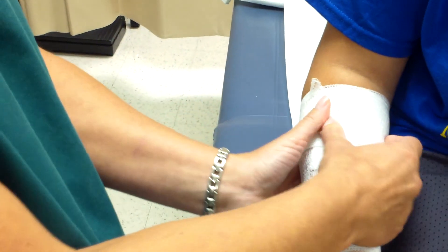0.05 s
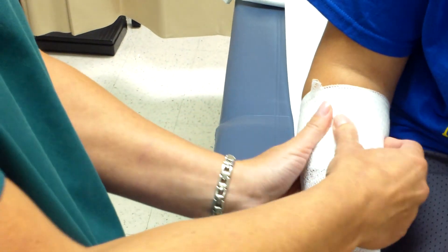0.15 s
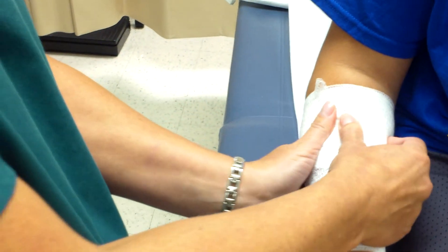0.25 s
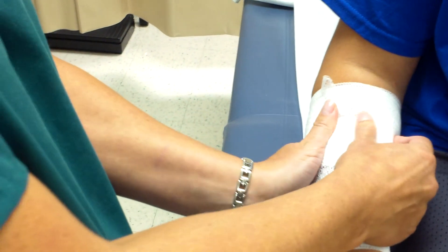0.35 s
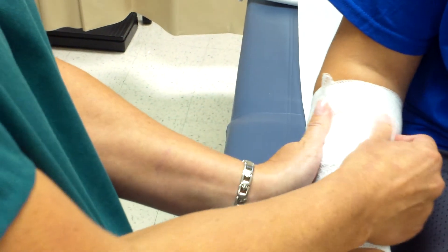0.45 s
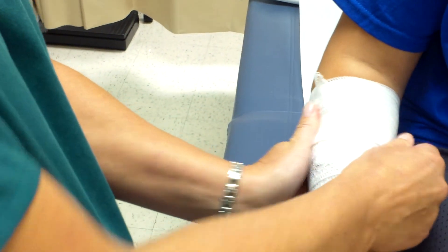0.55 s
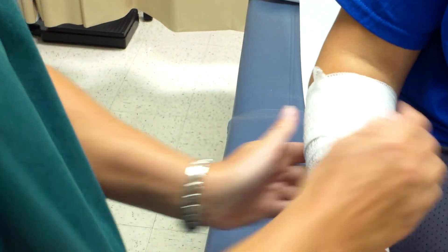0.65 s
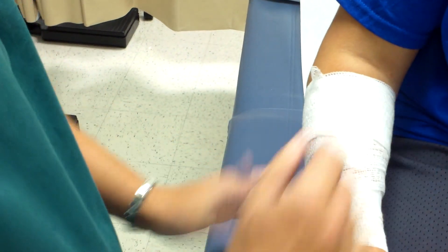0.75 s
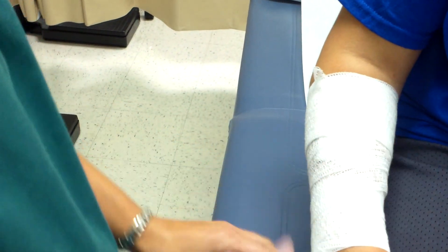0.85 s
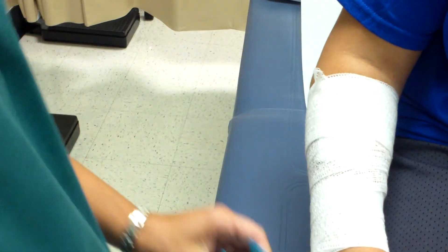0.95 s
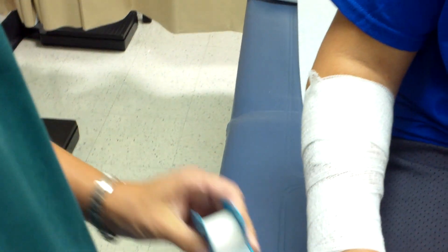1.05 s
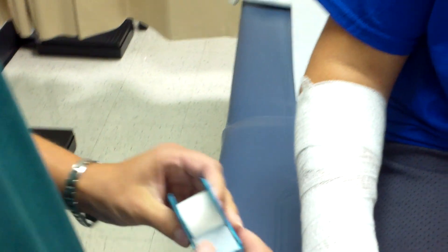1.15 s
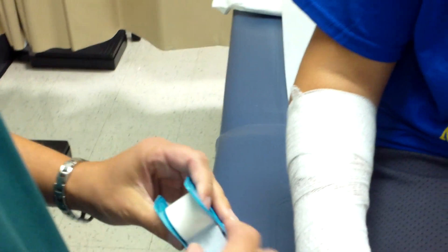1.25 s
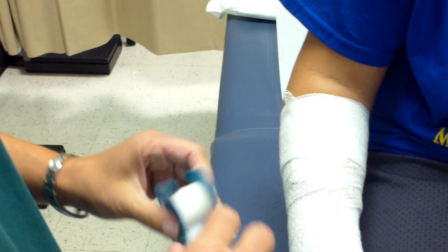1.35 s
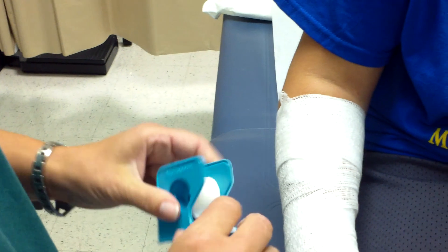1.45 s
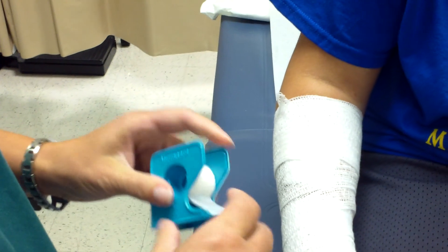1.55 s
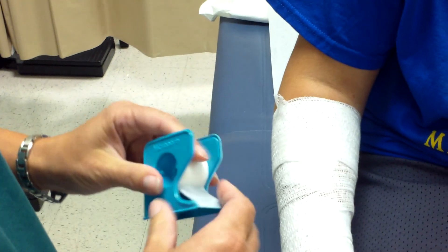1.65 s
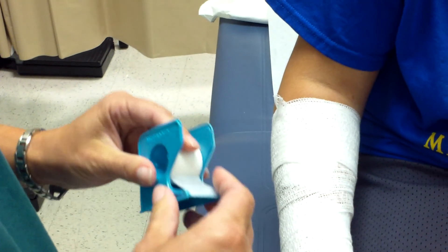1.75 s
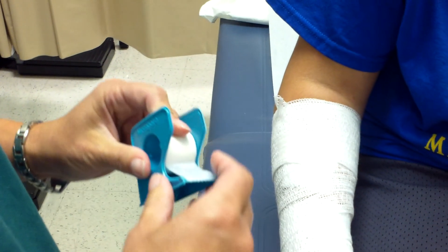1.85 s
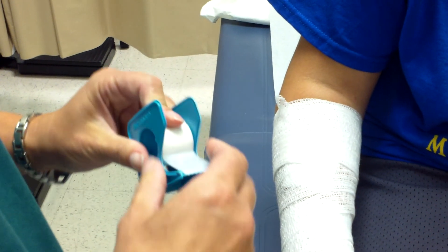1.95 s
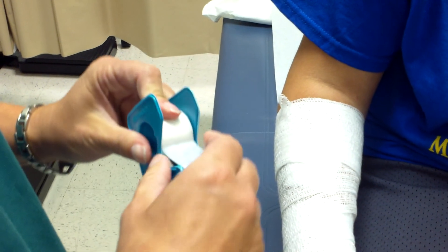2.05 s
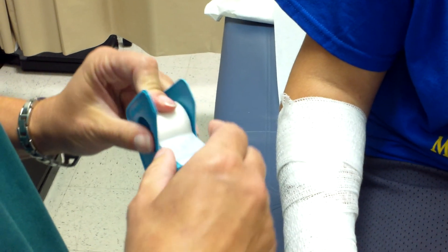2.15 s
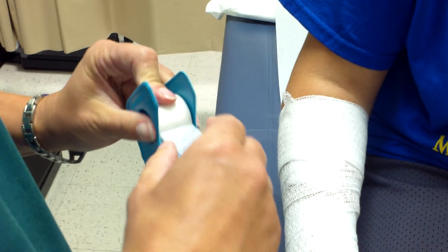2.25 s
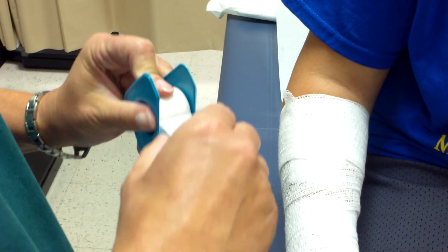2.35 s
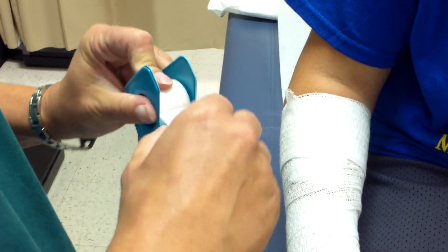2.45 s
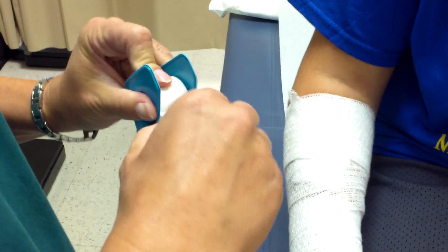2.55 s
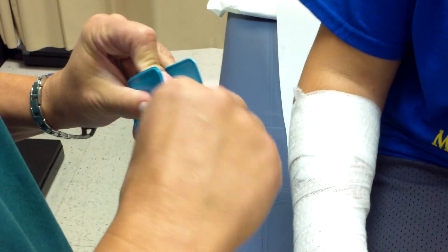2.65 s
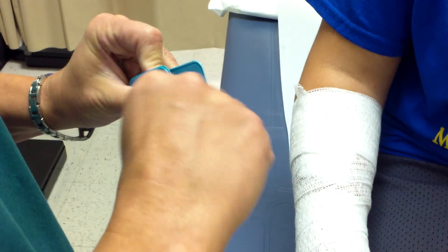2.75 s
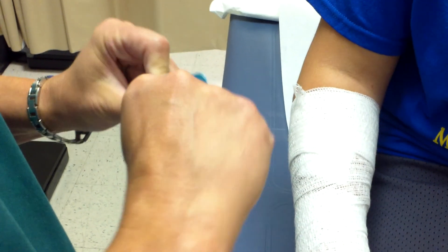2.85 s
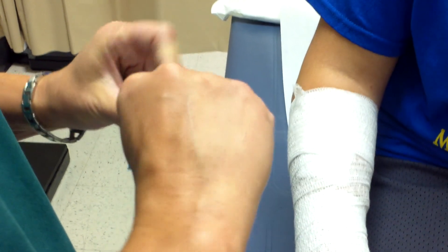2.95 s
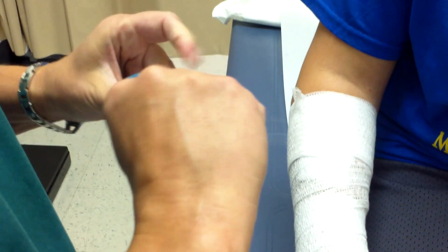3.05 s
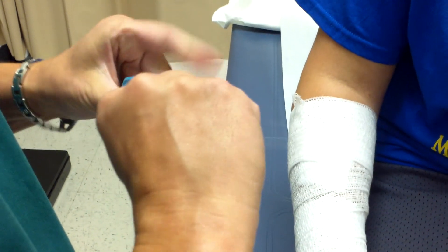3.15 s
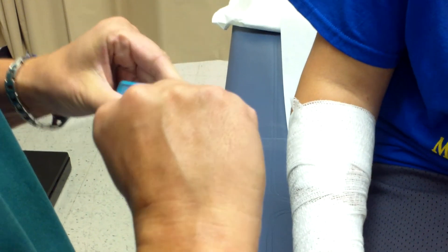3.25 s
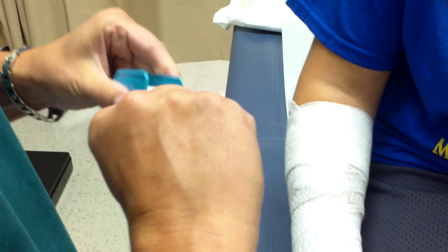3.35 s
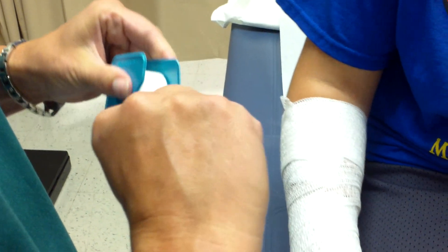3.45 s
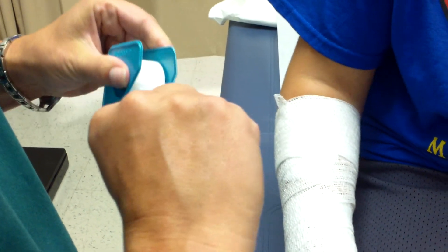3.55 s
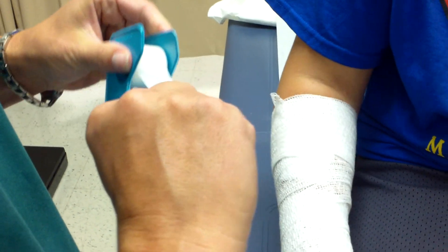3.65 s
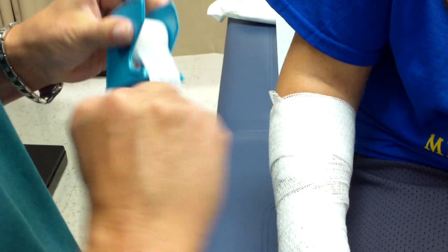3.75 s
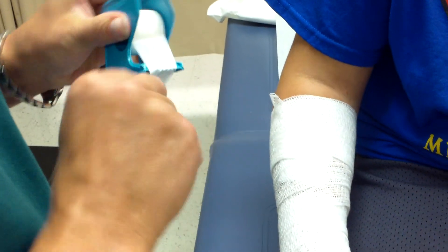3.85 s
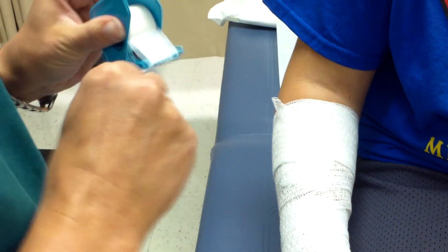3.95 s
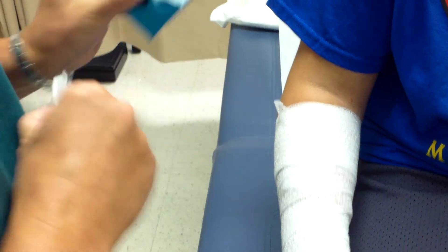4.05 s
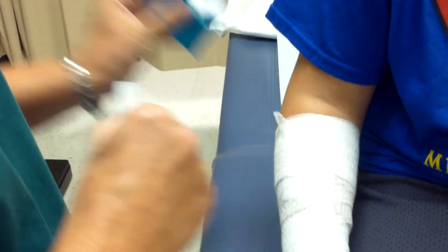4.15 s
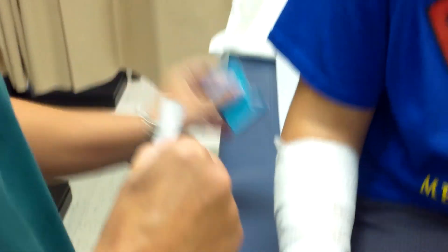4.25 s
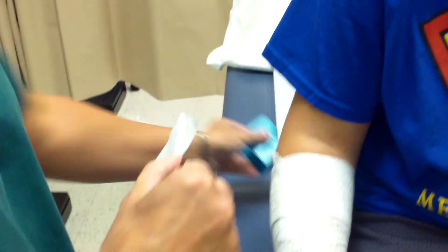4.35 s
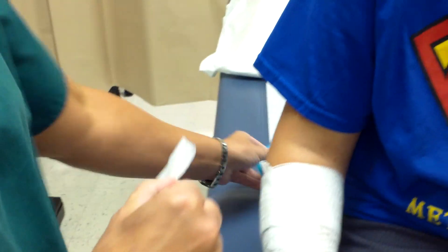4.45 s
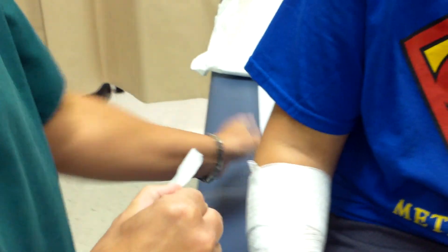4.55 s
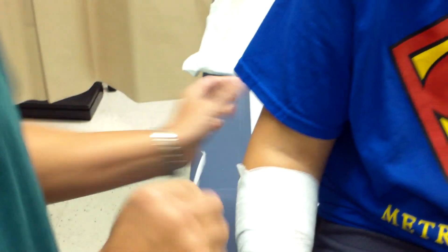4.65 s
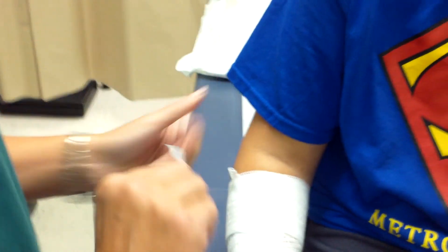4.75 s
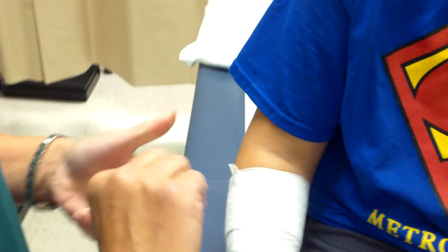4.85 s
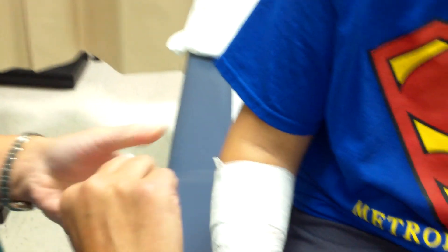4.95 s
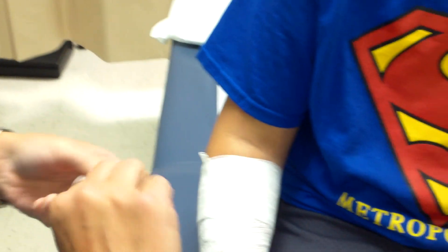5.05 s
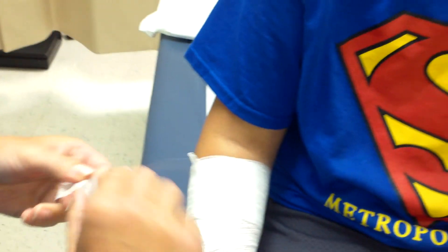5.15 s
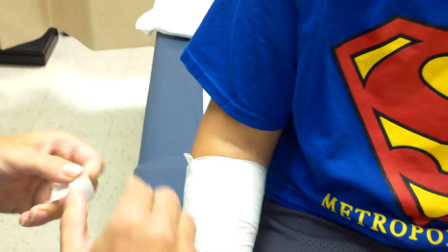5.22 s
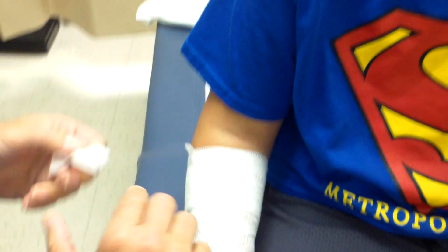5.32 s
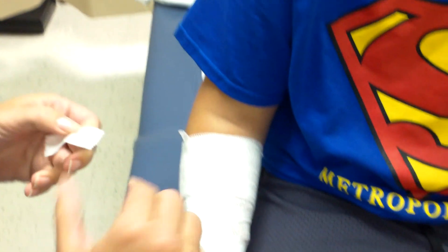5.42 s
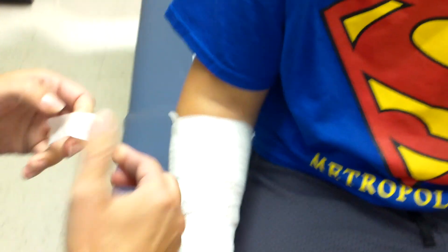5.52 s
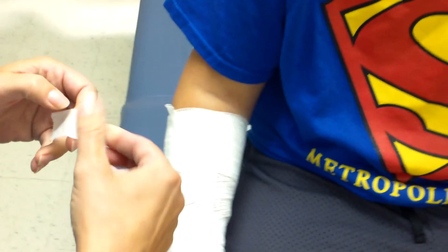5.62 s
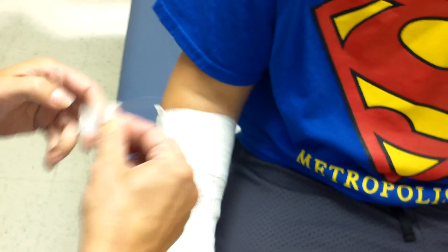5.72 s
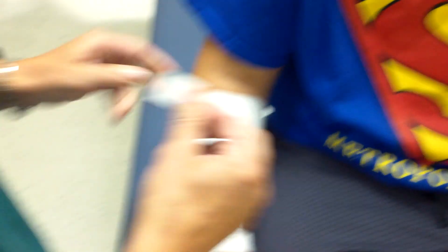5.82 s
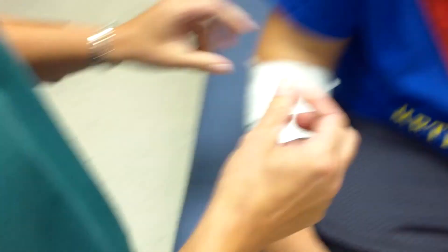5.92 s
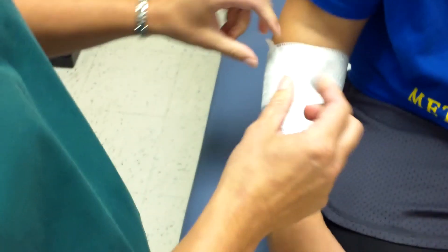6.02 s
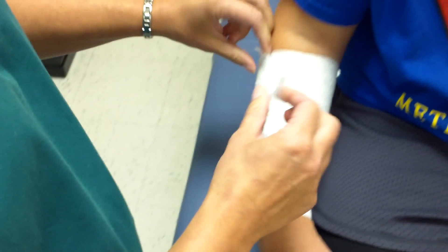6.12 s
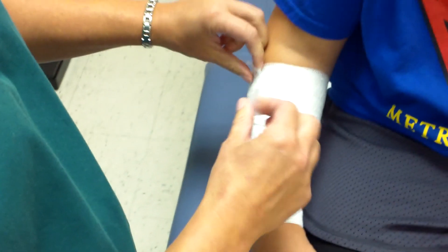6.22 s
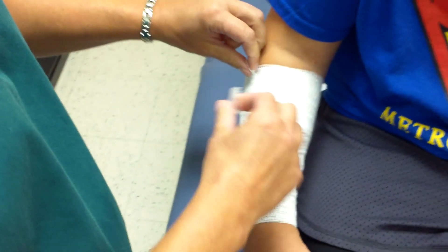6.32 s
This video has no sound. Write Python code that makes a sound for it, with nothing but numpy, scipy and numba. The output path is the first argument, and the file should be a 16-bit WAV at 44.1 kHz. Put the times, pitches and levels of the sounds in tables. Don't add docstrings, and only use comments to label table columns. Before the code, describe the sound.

Close up in a small ventilated room, hands brush over gauze with soft fibrous rustles. A hollow plastic dispenser is grabbed with a loud double clack, then turned with small creaks. A nail picks at the tape end, the glue crackles and snaps as tape peels, and a very short, sharp rip cuts through. The dispenser is put down with knocks; the sticky strip is then handled with pops, dry ticks and low air puffs.

```python
import sys
import numpy as np
from scipy import signal
from scipy.fft import rfft, irfft
from scipy.io import wavfile
from scipy.ndimage import uniform_filter1d
from numba import njit

SR = 44100
rng = np.random.default_rng(int(sys.argv[2]) if len(sys.argv) > 2 else 0)


def amplitude_ratio(level_db):
    exponent = np.asarray(level_db, float) / 20
    return 10 ** exponent


def wav_record(signal):
    frames = np.transpose(np.atleast_2d(signal))
    bounded = np.clip(frames, -1, 1)
    quanta = np.round(bounded * 32767).astype(np.int16)
    wavfile.write(sys.argv[1], SR, quanta)


N = 281336

# pitch_hz, density_db [dB per Hz]
AIR_COLOUR = [(20, -1), (45, 0), (110, -3), (210, -4.5), (500, -12), (1000, -17), (2000, -20), (4500, -27),
              (8000, -32), (16000, -38)]
# time_s, gain_db
GAIN_CONTROL = [
    (0, -0.5),
    (4.02, -0.5),
    (4.06, -9),
    (4.535, -7.5),
    (4.555, 2.5),
    (6.4, 1),
]
# time_s, level_db
GUSTS = [(.6, -47.5), (2.27, -68), (2.948, -52.5), (3.46, -48.5), (4.62, -51.5), (4.8, -49), (5.13, -47),
         (5.33, -55), (5.55, -48), (5.971, -50), (6.38, -52)]
# pitch_hz, width_hz, gain_db
PORT_MODES = [(3400, 300, 2), (6600, 1300, 4), (7860, 2200, -7.5), (9160, 1100, 6.5), (9850, 430, 2.5)]
# start_s, ring_db, ring_hz, thump_db, thump_hz
TAPS = [(.976, -36, 1530, -26, 420), (1.869, -40, 900, -34, 220), (1.893, -45, 3200, -35, 200),
        (1.9281, -21.5, 900, -29, 1400), (3.778, -38, 790, -32, 1100), (4.568, -33.5, 656, -31, 354),
        (4.667, -26.5, 624, -23.5, 234), (4.9438, -15.5, 1484, -32, 516), (5.2512, -27, 800, -45, 1310),
        (5.2504, -32, 1900, -50, 266), (5.2535, -32, 820, -55, 400), (5.3764, -27, 1550, -50, 613),
        (5.3739, -21, 1640, -50, 197), (5.505, -21, 1750, -50, 104), (5.51, -30, 1300, -50, 300),
        (5.774, -32.5, 800, -38, 400)]
# drop_s, push_db, dip_db, swing_hz, rebound [ratio to dip]
PUFFS = [
    (4.768, -50, -29, 55, .3),
    (4.907, -35, -34, 60, .2),
    (5.058, -50, -35, 90, .3),
    (5.114, -42, -35, 45, .6),
    (5.2502, -16.5, -29, 95, .1),
    (5.3737, -20, -25, 115, .4),
    (5.5053, -17, -18, 116, 1.2),
    (5.918, -37, -40, 30, .3),
    (5.994, -36, -38, 32, .3),
    (6.363, -36, -38, 35, .3),
]
# pitch_hz, width_hz, level_db
SHELL_MODES = [(2150, 430, -4.5), (3370, 200, 2), (4960, 1200, -41.5)]
# low_hz, high_hz, level_db
WEAVE_BANDS = [(3400, 6000, -3), (5900, 7400, 1), (8300, 10820, -0.5), (10200, 14500, -11)]
IDLE_HANDS = (-67.5, -63.5, -64)
# start_s, firmest_s, end_s, level_db, fineness [0 dull - 2 hissy]
STROKES = [(0, -0.01, 0.35, -45, 1.29), (0.155, 0.197, 0.23, -41.5, 2), (0.345, 0.41, 0.47, -41.5, 2),
           (.46, 0.53, 0.74, -40, 2.22), (0.623, 0.735, 1.005, -40.5, 1.14),
           (0.876, 0.946, 1.35, -43, 0.56), (1.11, 1.182, 1.33, -51.5, 1.2), (1.45, 1.52, 1.5, -56, 1.9),
           (1.83, 1.88, 2.17, -41, -0.1), (1.86, 1.935, 2.7, -55, 1.9), (2.25, 2.336, 2.44, -50, 1.1),
           (2.81, 2.89, 3.4, -42.5, 1.3), (3.121, 3.303, 3.42, -38, 1.8), (3.277, 3.48, 3.58, -36, 1.6),
           (3.4, 3.517, 3.59, -39.5, 1.1), (3.59, 3.7, 4.16, -46, 1.44), (3.754, 4.01, 4.04, -45.5, 1.1),
           (1.93, 1.938, 2.0, -33.5, -0.3), (4.55, 4.575, 4.76, -39.5, 2.33),
           (4.623, 4.673, 4.79, -39, -0.11), (4.65, 4.75, 4.9, -53, 1.6), (4.9, 5.39, 5.7, -49.5, -0.21),
           (5.6, 5.906, 5.8, -49.5, 1.1)]
# start_s, end_s, first_hz, last_hz, level_db
SINGS = [
    (1.275, 1.41, 3770, 3800, -58),
    (2.32, 2.455, 3300, 3200, -63),
    (2.704, 2.712, 2180, 2050, -46),
    (2.738, 2.754, 1900, 2050, -43),
    (3.18, 3.235, 2300, 2250, -48),
    (3.292, 3.443, 1970, 1110, -49.5),
    (3.458, 3.51, 1000, 850, -43),
    (3.535, 3.56, 750, 720, -41),
]
# start_s, end_s, first_hz, last_hz, level_db
OVERTONES = [
    (.39, .44, 6500, 6700, -51),
    (1.03, 1.06, 3450, 3450, -52),
    (3.19, 3.24, 4900, 4800, -48),
    (3.25, 3.29, 6800, 6800, -49),
    (3.39, 3.425, 3850, 3750, -45),
    (3.45, 3.47, 4700, 4600, -45),
    (3.49, 3.54, 3200, 3250, -43),
    (4.04, 4.075, 3950, 3950, -50),
    (4.1, 4.15, 3700, 3700, -63),
]
# start_s, end_s, first_hz, last_hz, level_db
FINE_HISS = [
    (.51, .535, 9600, 9300, -48),
    (.57, .67, 9600, 9600, -52),
    (3.02, 3.05, 9500, 9500, -55),
    (3.215, 3.25, 9800, 9600, -48),
    (3.3, 3.34, 9700, 10000, -45),
    (3.41, 3.445, 9200, 9200, -44),
    (3.47, 3.525, 9200, 9150, -42),
    (3.53, 3.6, 9200, 9200, -50),
]
# start_s, rise_s, fall_s, shell_db, treble_db
CRINKLES = [(0.959, 0.029, 0.04, -33, -44), (1.379, 0.028, 0.021, -45.5, -54), (1.5, 0.024, .014, -60, -53),
            (1.585, 0.043, 0.038, -47, -47), (1.698, 0.015, 0.032, -47.5, -50),
            (1.929, .0025, 0.07, -60, -65), (.495, .027, .06, -50, -46), (2.696, .012, .03, -56, -54),
            (2.728, .02, .035, -55, -53), (2.19, 0.037, .05, -55.5, -54), (2.31, .015, 0.13, -57.5, -70),
            (2.6, 0.008, 0.12, -51.5, -54), (2.862, 0.04, 0.062, -47.5, -62),
            (2.922, 0.0036, 0.11, -42, -42), (2.954, .004, 0.047, -35, -42), (3.05, .038, .036, -45.5, -58),
            (3.436, 0.04, 0.3, -44.5, -40), (3.756, .019, .03, -47.5, -46), (3.857, 0.029, .03, -50.5, -48),
            (4.553, 0.02, 0.04, -39.5, -38.5), (4.65, 0.014, 0.095, -37, -37.5),
            (5.338, 0.013, 0.03, -43, -54), (5.503, 0.0032, .018, -37.5, -53),
            (5.524, 0.012, 0.074, -47.5, -49), (5.747, 0.022, 0.045, -40, -41)]
# start_s, densest_s, end_s, level_db
THREADS = [
    (2.834, 2.926, 3.1, -44),
    (3.12, 3.25, 3.76, -53),
    (3.284, 3.48, 3.57, -45),
    (4.56, 4.58, 4.7, -57),
]
# start_s, shell_hz, shell_db, treble_db [peaks]
CREAKS = [(.9455, 2230, -27.5, -32), (.9763, 3350, -2, -6.5), (.996, 3350, 0, -4.5),
          (1.4138, 3160, -25, -25), (1.4995, 2810, -39, -52), (1.6034, 3140, -28, -23),
          (1.6196, 2700, -29, -26), (1.929, 1310, -31, -50), (1.9974, 799, -45, -28),
          (2.051, 3000, -36, -52), (3.7694, 750, -35, -45), (3.8575, 1320, -55, -23.5),
          (3.8706, 1950, -31, -18), (4.0356, 2100, -11, -15), (4.403, 10000, -46, -46),
          (4.5291, 4050, -42, -56), (4.5642, 760, -32, -17.5), (4.6329, 710, -23, -37),
          (4.6588, 2000, -19.5, -28), (4.6694, 1870, -18, -14.5), (4.815, 721, -36, -32),
          (5.1067, 2150, -27, -36), (5.731, 790, -28.5, -28)]
# start_s, shell_hz, shell_db, treble_db [peaks]
CLICKS = [(.9635, 2900, -30, -30), (.991, 3400, -17, -20), (1.008, 6600, -26, -28), (2.625, 6600, -38, -32),
          (2.7085, 2150, -34, -32), (2.748, 2300, -33, -38), (2.802, 4700, -42, -42),
          (2.817, 2300, -42, -55), (2.9226, 2050, -10, -30), (2.9367, 2050, -16, -30),
          (2.9553, 2050, -12, -30), (3.2776, 9500, -35, -32), (3.2911, 6800, -33, -30),
          (3.3245, 9800, -28, -28), (3.361, 3800, -28, -26), (3.371, 9300, -28, -26),
          (3.4153, 4000, -28, -24), (3.425, 2400, -21, -30), (3.4502, 4700, -30, -27),
          (3.462, 9200, -26, -26), (3.483, 9100, -25, -26), (3.496, 9300, -24, -26),
          (4.341, 10000, -52, -50), (4.386, 10000, -50, -48), (4.5765, 600, -30, -30),
          (5.1065, 1100, -32, -50)]
# start_s, centre_hz, body_db, treble_db [peaks]
TICKS = [
    (1.4396, 6150, -39, -45),
    (2.6638, 10100, -42, -36),
    (2.8294, 4430, -37, -45),
    (3.6335, 9000, -38, -40),
    (3.6586, 9000, -26.5, -30),
    (4.8848, 12400, -20.5, -32),
    (5.0379, 5900, -28, -46),
    (5.3493, 4600, -11.5, -44),
    (5.5365, 2600, -14, -41),
    (5.7748, 3400, -12, -31),
]
# start_s, shell_hz, shell_db, treble_db [peaks]
PICKS = [
    (2.252, 2250, -25.5, -46),
    (2.299, 2350, -32.5, -28),
    (2.3114, 2390, -31.5, -48),
    (2.4967, 2290, -35, -52),
    (2.5307, 2300, -32.5, -40),
    (2.5687, 2350, -28, -24.5),
    (2.606, 2350, -33.5, -22),
    (2.8664, 2130, -29, -29),
    (2.8888, 4360, -42, -38),
    (2.897, 4670, -31, -25),
]
# start_s, shell_hz, shell_db, treble_db [peaks]
PEELS = [(2.9223, 2160, -15, -20), (2.9365, 2170, -16, -22), (2.9433, 1940, -22, -13),
         (2.9552, 3000, -11.5, -16), (2.9647, 2290, -20, -19), (2.9903, 2270, -31, -27),
         (3.056, 2940, -25.5, -31), (3.0647, 2870, -37, -19), (3.0743, 2280, -44, -18),
         (3.0885, 3820, -27, -12.5), (3.136, 4880, -31, -31), (3.158, 4700, -29, -36),
         (3.1728, 2200, -16.5, -15), (3.183, 2230, -27, -18), (3.2269, 2280, -39, -16),
         (3.2605, 2210, -29, -27), (3.3003, 3900, -26, -11), (3.3825, 3800, -26, -30),
         (3.4067, 3840, -24, -33), (3.4245, 1170, -30, -33), (3.469, 5800, -22, -11),
         (3.49, 3200, -19, -13), (3.497, 3240, -24, -25)]
# pitch_hz, width_hz, level_db
TEAR_MODES = [(880, 500, -8), (2160, 340, -0.5), (3600, 500, 0), (5060, 830, -5), (7100, 860, -7.5),
              (9540, 1600, -7), (12000, 3000, -17)]
# start_s, hold_s, level_db
RIPS = [
    (4.011, .0012, -8),
    (4.0138, .0013, -5),
    (4.0158, .0018, -4),
    (4.0203, .001, -9),
    (4.0225, .0005, -16),
]


def level(x, db):
    return x * amplitude_ratio(db) / np.sqrt(np.mean(x ** 2))


def peak(x, db):
    return x * amplitude_ratio(db) / np.max(np.abs(x))


def add(out, s, x):
    i = int(s * SR)
    out[i:i + len(x)] += x[:N - i]


def decay(t, t60_s):
    return np.exp(-np.log(1000) * t / t60_s)


def band(x, lo_hz, hi_hz, order=2):
    edges = [lo_hz, min(hi_hz, .45 * SR)]
    return signal.sosfilt(signal.butter(order, edges, "bandpass", fs=SR, output="sos"), x)


def ring(x, modes):
    out = 0
    for k, (hz, width, db) in enumerate(modes):
        out = out + (-1) ** k * amplitude_ratio(db) * signal.lfilter(*signal.iirpeak(hz, hz / width, SR), x)
    return out


@njit
def glide(x, hz, width):
    y, b, l = np.empty(len(x)), 0., 0.
    for i in range(len(x)):
        g, k = np.tan(np.pi * hz[i] / SR), width / hz[i]
        v = (b + g * (x[i] - l)) / (1 + g * (g + k))
        b, l, y[i] = 2 * v - b, l + 2 * g * v, k * v
    return y


def walk(rate):
    k = int(SR / rate)
    steps = np.repeat(rng.standard_normal(N // k + 1), k)
    return 1.09 * uniform_filter1d(uniform_filter1d(steps, k), k)[:N]


def crackle(rate, spread_db):
    size = amplitude_ratio(spread_db * np.minimum(rng.exponential(size=N), 5))
    return (rng.random(N) < rate / SR) * size * rng.standard_normal(N)


def gain_control():
    s, db = np.transpose(GAIN_CONTROL)
    return amplitude_ratio(np.interp(np.arange(N) / SR, s, db))


def air():
    hz = np.fft.rfftfreq(N, 1 / SR) + 1
    table_hz, table_db = np.transpose(AIR_COLOUR)
    colour = amplitude_ratio(np.interp(np.log(hz), np.log(table_hz), table_db))
    vent = level(irfft(rfft(rng.standard_normal(N)) * colour, N), -49)
    hum = level(ring(rng.standard_normal(N), [(116.8, 14, 0)]), -56)
    return vent + hum


def gusts():
    t = np.arange(N) / SR
    gust_s, rumble_db, wander_db = .12, -52.5, 1.8
    swell = amplitude_ratio(rumble_db) + sum(amplitude_ratio(db) * np.exp(-((t - s) / gust_s) ** 2) for s, db in GUSTS)
    rumble = level(band(rng.standard_normal(N), 17.2, 53.2, order=3), -1.2)
    return swell * amplitude_ratio(wander_db * walk(7.5)) * rumble


def puffs():
    rise_cycles, drop_cycles = .05, .03
    out, t = np.zeros(N), np.arange(4000) / SR - .02
    for s, push_db, dip_db, hz, rebound in PUFFS:
        turns = t * hz
        after = np.maximum(turns, 0)
        push = np.exp(np.minimum(turns, 0) / rise_cycles - (after / drop_cycles) ** 2)
        settle = np.exp(-(np.maximum(turns - .75, 0) / .3) ** 2)
        swing = -np.sin(2 * np.pi * np.clip(turns, 0, .75)) * settle
        swing = np.where(swing > 0, rebound * swing, swing)
        add(out, s + t[0], amplitude_ratio(push_db) * push + amplitude_ratio(dip_db) * swing)
    return out


def taps():
    out, t = np.zeros(N), np.arange(4000) / SR
    for s, db, hz, thump_db, thump_hz in TAPS:
        onset = np.sin(np.minimum(t * hz, np.pi / 2)) ** 2
        pop = np.sin(2 * np.pi * hz * t) * decay(t, 0.016) * onset
        thump = np.cos(2 * np.pi * thump_hz * t + 0.66) * np.exp(-1.2 * thump_hz * t)
        thump = thump * np.minimum(t / 0.000083, 1)
        add(out, s, peak(pop, db) + peak(thump, thump_db))
    return out


def pressure():
    t = np.arange(N) / SR
    fall_db = 7.5
    power = (amplitude_ratio(IDLE_HANDS)[:, None] * gain_control()) ** 2
    for start, firm, end, db, fine in STROKES:
        share = amplitude_ratio(db - fall_db * np.abs(np.arange(3) - fine))
        power = power + (share[:, None] * np.interp(t, [start, firm, end], [0, 1, 0])) ** 2
    return np.sqrt(power)


def singing(table):
    t, edge_s = np.arange(N) / SR, 0.016
    start, end, first_hz, last_hz, _ = np.transpose(table)
    times, pitches = np.ravel([start, end], "F"), np.ravel([first_hz, last_hz], "F")
    hz = np.exp(np.interp(t, times, np.log(pitches)))
    gain = sum(amplitude_ratio(db) * np.clip(1 + np.minimum(t - a, b - t) / edge_s, 0, 1) ** 2
               for a, b, _, _, db in table)
    return hz, gain


def rubbing():
    low_gain, mid_gain, top_gain = pressure()
    slips = [level(crackle(rate, 2.0), 0) * amplitude_ratio(1.8 * walk(60)) for rate in (9000, 4000, 9000)]
    low = level(band(slips[0], 140, 800, order=1), -3.0)
    hollow = sum(amplitude_ratio(4 * walk(10)) * ring(slips[1], [mode]) for mode in SHELL_MODES)
    mid = level(band(slips[1], 1300, 4400) + 0.48 * hollow, -6.0)
    weave = slips[2] + 0.39 * slips[1]
    top = level(sum(amplitude_ratio(db + 1.6 * walk(30)) * band(weave, lo, hi) for lo, hi, db in WEAVE_BANDS), -2)
    patchy, waver, span = amplitude_ratio(4 * walk(60)), 1 + .006 * walk(40), 0
    for k, (table, width_hz) in enumerate([(SINGS, 200.), (OVERTONES, 250.), (FINE_HISS, 800.)]):
        hz, gain = singing(table)
        tone = glide(np.roll(slips[1], k * SR), hz * waver, width_hz)
        span = span + gain * level(np.roll(patchy, k * SR) * tone, 0)
    return low_gain * low + mid_gain * mid + top_gain * top + span


def crinkles():
    out, t = np.zeros(N), np.arange(8000) / SR
    creases = level(crackle(14000, 1.9), 0) * amplitude_ratio(3 * walk(150))
    broad = level(band(creases, 480, 4600, order=1), -1.5)
    top = level(band(creases, 4650, 10350), 0)
    for s, rise, fall, shell_db, top_db in CRINKLES:
        here = slice(int(s * SR), int(s * SR) + len(t))
        swell = np.minimum(t / rise, 1) ** 1.16 * amplitude_ratio(-30 * np.maximum(t - rise, 0) / fall)
        shell = level(ring(creases[here], [(2600, 1300, 0)]), 0) + broad[here]
        add(out, s, swell * (amplitude_ratio(shell_db) * shell + amplitude_ratio(top_db) * top[here]))
    return out


def threads():
    t = np.arange(N) / SR
    tail = rng.standard_normal(300) * np.exp(-t[:300] / 0.0005)
    clicks = band(signal.fftconvolve(crackle(360, 3.5), tail)[:N], 1900, 14000)
    gain = sum(amplitude_ratio(db) * np.interp(t, [a, b, c], [0, 1, 0]) for a, b, c, db in THREADS)
    return level(clicks, 0) * gain


def snaps(events, sharp, t60_s):
    t = np.arange(3000) / SR - .002
    noise = rng.standard_normal((len(events), len(t)))
    noise[:, np.argmax(t > 0)] = 4
    fade = decay(np.maximum(t, 0), t60_s)
    bursts = noise * (fade ** 4 + 0.2 * fade) * np.exp(np.minimum(t, 0) / 0.00037)
    broad, top = band(bursts, 1200, 4500, order=1), band(bursts, 3200, 11500, order=3)
    out = np.zeros(N)
    for k, (s, hz, shell_db, top_db) in enumerate(events):
        shell = ring(bursts[k], [(hz, hz / sharp, 0)]) + .22 * broad[k]
        add(out, s + t[0], peak(shell, shell_db - 0.5) + peak(top[k], top_db - 7.5))
    return out


def tear():
    t = np.arange(N) / SR
    attack_s, fall_db_s, tail_db, tail_db_s = 0.00068, 6004, -11, 1100
    gain = 0
    for s, hold, db in RIPS:
        after = np.clip(t - s - hold, 0, 1)
        gain = gain + amplitude_ratio(db - fall_db_s * after) * np.clip((t - s) / attack_s, 0, 1)
    gain = gain + (t > s) * amplitude_ratio(db + tail_db - tail_db_s * after)
    return gain * level(band(ring(crackle(12000, 3.6), TEAR_MODES), 450, 19000), 0)


def room(x):
    t = np.arange(SR // 2) / SR
    echo = band(rng.standard_normal(len(t)), 600, 9500, order=1) * decay(t, 0.21) * (t > .004)
    return amplitude_ratio(-26) * signal.fftconvolve(x, echo / np.sqrt(np.sum(echo ** 2)))[:N]


def scene():
    low = air() * gain_control() + gusts() + puffs() + taps()
    hands = rubbing() + crinkles() + threads()
    hands = hands + snaps(CREAKS, 3.5, 0.044) + snaps(CLICKS, 7.0, .05) + snaps(TICKS, 1.9, 0.021)
    hands = hands + snaps(PICKS, 14.0, 0.042) + snaps(PEELS, 2.6, 0.07) + tear()
    mono = hands + low + room(hands)
    return np.array([mono, mono])


def roll_off(x):
    return signal.sosfilt(signal.butter(12, 16820, fs=SR, output="sos"), x)


def record(dry):
    x = dry[0]
    for hz, width, db in PORT_MODES:
        x = x + (amplitude_ratio(db) - 1) * signal.lfilter(*signal.iirpeak(hz, hz / width, SR), x)
    hiss = level(band(rng.standard_normal(N), 3000, 15000, order=1), -61)
    x = x + hiss * gain_control()
    rounded = .6 * np.tanh(x / .6)
    x = signal.sosfilt(signal.ellip(10, .2, 80, 15800, fs=SR, output="sos"), rounded)
    return roll_off(np.array([x, x]))


dry = scene()
out = record(dry)
wav_record(out)
```